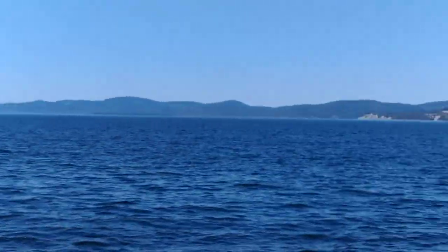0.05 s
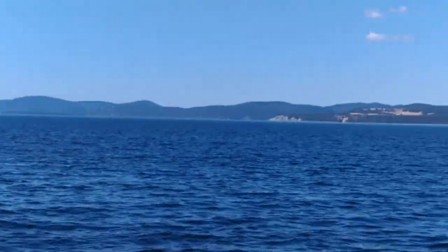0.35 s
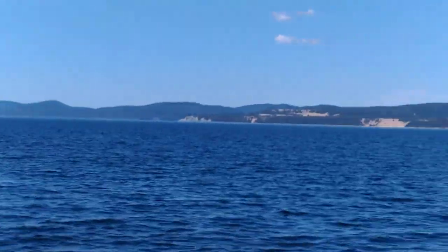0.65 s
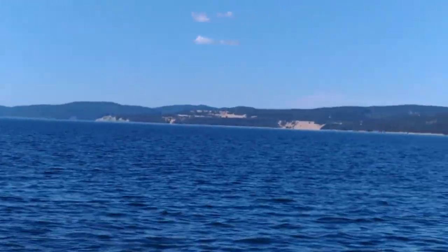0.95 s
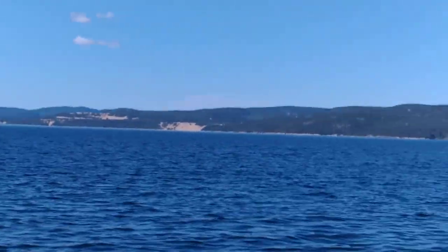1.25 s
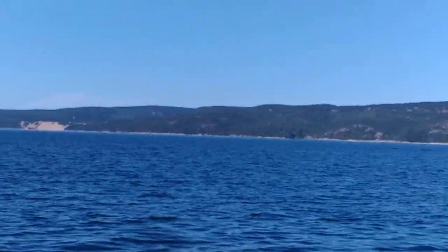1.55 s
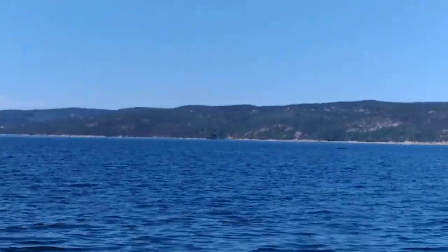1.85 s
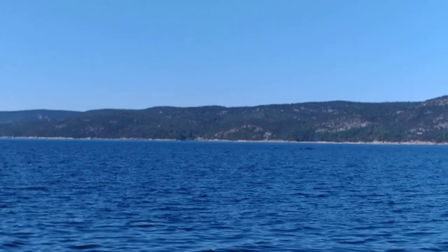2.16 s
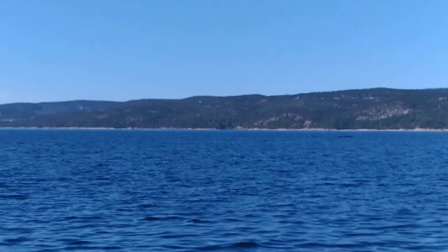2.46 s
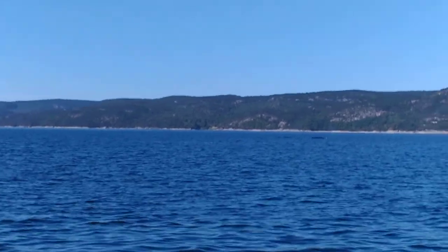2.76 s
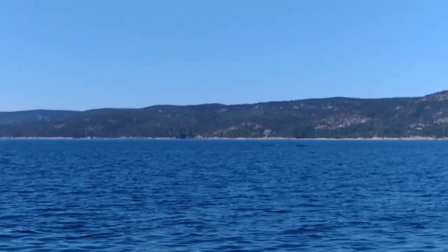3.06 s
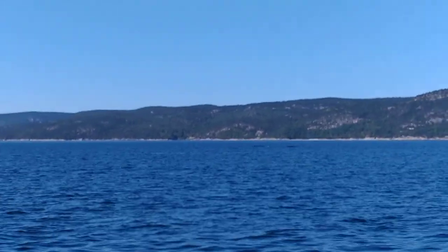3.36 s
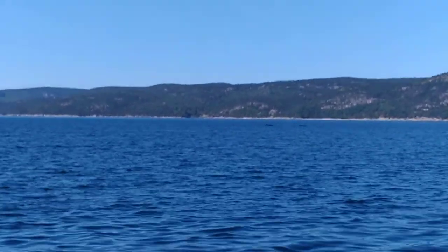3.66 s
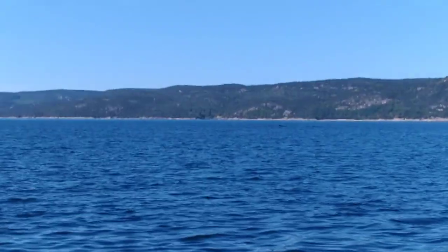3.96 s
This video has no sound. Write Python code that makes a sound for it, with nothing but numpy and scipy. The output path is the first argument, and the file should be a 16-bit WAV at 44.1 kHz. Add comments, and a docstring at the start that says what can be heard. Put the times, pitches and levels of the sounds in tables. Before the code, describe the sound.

Gusts of wind rumble and knock against the microphone out on open water, easing briefly early on, then blowing more steadily from the right. Small waves wash and trickle behind it, along with a faint low engine hum.

```python
"""Wind gusts thump two microphone ports, mostly the right, on open water, probably from a boat.
Eddies buffet the ports; air hisses across their openings and rustles at the right rim.
Wavelets gurgle and trickle as bubbles ring; short grainy bursts are wind rustle or a little spray.
Underneath lie the wash of the water and a faint drone, likely an engine."""
import sys
import numpy as np
from scipy import signal
from scipy.fft import rfft, irfft
from scipy.io import wavfile
from scipy.ndimage import uniform_filter1d, minimum_filter1d

SR = 44100
rng = np.random.default_rng(int(sys.argv[2]) if len(sys.argv) > 2 else 0)


def to_wav(s):
    """Save 16-bit WAV."""
    ch = np.atleast_2d(s).T  # columns
    pcm = np.round(np.clip(ch, -1, 1) * 32767)  # PCM
    wavfile.write(sys.argv[1], SR, pcm.astype(np.int16))


N = 176400
TIME = np.arange(N) / SR
HZ = np.fft.rfftfreq(N, 1 / SR)

# wind pressure per port (time [s], level [dB])
GUST_LEFT = [(0.0, -9), (0.13, -22), (0.24, -16), (0.31, -26), (0.35, -20.5), (0.48, -52), (0.85, -25.5),
             (0.99, -19), (1.11, -37), (1.18, -22), (1.27, -45), (1.51, -39), (1.56, -21), (1.61, -21.5),
             (1.65, -58), (2.13, -54), (2.18, -11.5), (2.24, -54), (3.41, -54), (3.46, -15), (3.52, -50),
             (3.84, -27), (3.86, -43), (4.0, -30)]
GUST_RIGHT = [(0, -13.5), (.13, -24.5), (.255, -27), (.28, -15), (.32, -21), (.36, -18.5), (.44, -15.5),
              (.47, -28.5), (0.494, -18.5), (.53, -28), (.67, -53), (.78, -31.5), (1.04, -32.5),
              (1.088, -17.5), (1.13, -31.5), (1.16, -17.5), (1.21, -24), (1.245, -16), (1.275, -24),
              (1.3, -16), (1.35, -22), (1.44, -27.5), (1.47, -16), (1.62, -14), (1.8, -26), (1.82, -36),
              (1.84, -28.5), (1.89, -15.5), (1.97, -23), (2, -16.5), (2.45, -15), (2.49, -12.5),
              (2.54, -12.5), (2.575, -22), (2.601, -13.5), (2.88, -16), (2.97, -13.5), (3.06, -18),
              (3.09, -15), (3.27, -13), (3.48, -14.5), (3.55, -28.5), (3.61, -27.5), (3.64, -25.5),
              (3.669, -15), (3.75, -12), (3.81, -21.5), (3.91, -17), (3.96, -23), (4, -17.5)]
# buffeting in a full gust (frequency [Hz], relative density [dB])
BUFFET_COLOUR = [(20, -52), (48, -42), (62, -18), (76, -8.5), (88, -11.5), (125, 2.5), (145, -2),
                 (200, 0.5), (300, -3), (450, -8.5), (700, -18.5), (1100, -37.5), (1800, -42), (2600, -60),
                 (3600, -59), (7000, -85)]
# right-port buffeting felt on the left (frequency [Hz], gain [dB])
SPILL_GAIN = [(40, -24), (75, -8), (125, -18), (250, -33), (600, -23), (2000, -36)]
# hard eddies (time [s], relative peak [dB], pitch [Hz], rise [s], port [0 left, 1 right])
THUMP_EVENTS = [(0.005, 8, 243, 0.0034, 0), (0.03, -7, 275, 0.0051, 0), (0.058, -5, 332, 0.0015, 0),
                (.274, -9, 133, .005, 1), (0.286, -12, 335, 0.0018, 1), (.39, -11.5, 108, .02, 1),
                (0.658, -24.5, 596, 0.0033, 1), (0.994, -11.5, 169, 0.0057, 0), (1.081, -12, 140, .008, 1),
                (1.159, -17.5, 260, 0.0052, 1), (1.241, -17, 385, .003, 1), (1.301, -12.5, 194, 0.0042, 1),
                (1.47, -5, 210, 0.0023, 1), (1.569, -8, 220, 0.0034, 1), (1.894, -13, 356, 0.0018, 1),
                (2.008, -8.5, 447, 0.0048, 1), (2.053, -5, 223, 0.0032, 1), (2.14, -6, 243, 0.0049, 1),
                (2.181, -9, 178, 0.0077, 1), (2.257, -6, 199, 0.0027, 1), (2.28, -3.5, 310, 0.0046, 1),
                (2.505, -20, 228, 0.0037, 1), (2.616, -5, 230, 0.0049, 1), (2.758, -4, 239, 0.0029, 1),
                (2.984, -2.5, 243, 0.0025, 1), (3.209, 1, 270, 0.0026, 1), (3.232, -1.5, 268, 0.0027, 1),
                (3.255, -9, 222, 0.0026, 1), (3.279, -3.5, 268, 0.0059, 1), (3.314, -9.5, 268, 0.0034, 1),
                (3.709, 0, 209, 0.0019, 1), (3.734, -2.5, 227, 0.0056, 1), (3.748, -13, 317, 0.0065, 1),
                (3.911, -7, 172, 0.0043, 1)]
# eddy roughness (frequency [Hz], relative density [dB])
THUMP_COLOUR = [(30, -47), (120, 0), (280, 6), (550, -2.5), (1000, -15), (2000, -37.5), (6000, -70)]
# hiss per port (time [s], relative level [dB])
HISS_LEFT = [(0.0, -38.5), (0.32, -40.5), (0.41, -39), (0.47, -40.5), (1.41, -41), (1.53, -27), (1.61, -33),
             (1.74, -42.5), (2.09, -42.5), (2.14, -32), (2.28, -41.5), (2.55, -36.5), (2.64, -44),
             (2.72, -38), (3.03, -43), (3.16, -43), (3.38, -45), (3.47, -38.5), (3.65, -41), (4.0, -41.5)]
HISS_RIGHT = [(0.0, -34), (0.27, -39.5), (0.3, -32.5), (0.44, -32), (0.47, -38), (0.71, -43), (0.81, -39),
              (0.96, -42.5), (1.11, -41.5), (1.26, -43), (1.32, -34.5), (1.42, -39.5), (1.53, -30.5),
              (1.61, -36.5), (1.73, -44), (2.0, -47), (2.02, -34), (2.21, -36.5), (2.39, -32.5), (2.6, -36),
              (2.97, -35), (3.06, -43), (3.09, -35), (3.32, -36.5), (3.4, -34), (3.49, -36), (3.65, -47.5),
              (3.68, -33), (3.86, -44), (3.88, -34.5), (4.0, -44)]
# hiss with port resonances and notches (frequency [Hz], relative density [dB])
HISS_COLOUR = [(600, 4.5), (2200, -13), (3000, -18), (3800, -18.5), (4100, 1), (4450, 0), (5300, -2.5),
               (6000, -2.5), (6500, -3), (7200, -2), (7700, -12), (7950, -35), (8400, -9.5), (9300, -4),
               (10500, -1), (11400, -3.5), (11950, -14), (12300, -47), (12750, -32), (13200, -15),
               (14300, -14.5), (15700, -18)]
# extra shaping of the left hiss (frequency [Hz], gain [dB])
LEFT_SHADE = [(3000, 7), (5300, 9.5), (7200, -0.5), (9300, 3), (11400, -4.5), (14000, 3), (15500, -4)]
# fast air at the right rim (frequency [Hz], relative density [dB])
RUSTLE_COLOUR = [(400, -34), (900, 11), (1080, -6.5), (1300, 3), (1700, -3.5), (2050, -7), (2400, -6.5),
                 (2900, -3), (3500, -20), (4500, -21), (7000, -44)]
# right-port resonances (centre [Hz], width [Hz], level [dB])
RESONANCES = [(4480, 300, -48), (5890, 140, -53.5)]
# short grainy bursts: wind rustling at the right port (0.288 s, 0.347 s), and water splashes
# (start [s], length [s], left [dB], right [dB], centre [Hz], half-width [octaves])
NOISE_BURSTS = [(.005, 0.12, -42, -37.5, 850, .55), (0.288, 0.05, -49, -34.5, 940, 0.67),
                (0.347, 0.092, -47, -36, 1380, 1.12), (1.453, 0.15, -39.5, -37.5, 5000, 0.52),
                (1.514, 0.063, -33.5, -37, 3770, 0.77), (1.642, 0.016, -47, -40, 1500, 0.92),
                (2.127, .025, -39, -32, 5330, 0.22), (2.72, 0.032, -57, -46, 3500, 0.087),
                (3.114, 0.21, -56, -43, 1570, 0.37), (3.44, 0.05, -44, -42, 3000, 0.67)]
# bubbles (low [Hz], high [Hz], rate [1/s], decay [cycles], size spread [dB], base level [dB])
GURGLE_BUBBLES = (848.5, 2152, 227, 16.5, 2.3, -38.5)
TRICKLE_BUBBLES = (4247, 6103, 202, 19, 9, -54)
# water wash (frequency [Hz], relative density [dB])
WASH_COLOUR = [(20, -32), (48, -30), (75, -18), (95, -4), (125, 5), (210, -7.5), (290, -6.5), (450, -10.5),
               (700, -11), (850, -19), (1000, -17), (1200, -22.5), (2000, -29), (3000, -32), (3800, -37),
               (8000, -67)]
# left-right likeness of the wash (frequency [Hz], correlation [0..1])
WASH_CORRELATION = [(60, 0.24), (130, 0.17), (290, 1), (640, 0.93), (1400, 0.56), (3000, 0.0046)]
# drone lines (frequency [Hz], level [dB])
ENGINE_LINES = [(41, -68), (76, -45), (120.5, -42.5), (301, -40.5)]

FULL_GUST_DB = -13


def buffet(gust, gain_db):
    """Eddies buffet one port; stronger gusts are brighter, and the upper octaves flutter more."""
    eddy_db, eddy_hz, flutter_db, flutter_hz = 1.14, 24.7, 2.5, 64
    tilt_per_octave, tilt_above_hz = 0.58, 211
    force_db, eddies, shared_flutter = curve(gust), wobble(eddy_hz), wobble(flutter_hz)
    air = flecked(BUFFET_COLOUR, depth_db=2.5)
    steady_air = rfft(air / np.sqrt(uniform_filter1d(air ** 2, size=2600)))
    centres_hz, out = np.geomspace(60, 3840, 7), np.zeros(N)
    for hz, share in zip(centres_hz, np.eye(len(centres_hz))):
        band = irfft(steady_air * spectrum(np.c_[centres_hz, share], HZ), N)
        octaves = max(np.log2(hz / tilt_above_hz), 0)
        flutter = (shared_flutter + wobble(flutter_hz)) / np.sqrt(2)
        churn = unit(amp(eddy_db * eddies + flutter_db * min(octaves, 1) * flutter))
        tilt_db = tilt_per_octave * octaves * (force_db - FULL_GUST_DB)
        out += band * churn * amp(force_db + tilt_db)
    return amp(gain_db) * out


def thumps(gain_db=-3.5, rough_db=-9, fall_per_rise=1.12):
    """Hard eddies rock one port for a few rough swings and die quickly."""
    out = np.zeros((2, N))
    rough = amp(rough_db) * noise(spectrum(THUMP_COLOUR, HZ))
    for time_s, peak_db, hz, rise_s, port in THUMP_EVENTS:
        age_s = TIME - time_s
        width_s = np.where(age_s < 0, rise_s, rise_s * fall_per_rise)
        push = np.exp(-.5 * (age_s / width_s) ** 2)
        swing = np.sin(2 * np.pi * (hz * age_s + rng.random()))
        out[port] += amp(peak_db + gain_db) * push * (swing + rough)
    return out


def hiss(levels, gain_db, shade_db=0, flicker_db=0.98, flicker_hz=44.4):
    """Air streams across one port's opening."""
    air = rfft(flecked(HISS_COLOUR, depth_db=3))
    shaded = unit(irfft(air * amp(shade_db), N))
    return shaded * amp(curve(levels) + gain_db + flicker_db * wobble(flicker_hz))


def rush_db(hiss_cap_db=-34.5):
    """Strength of the rushing air: follows the right port's gusts and, up to a cap, its hiss."""
    from_hiss_db = 1.42 * np.minimum(curve(HISS_RIGHT) - hiss_cap_db, 0)
    from_gust_db = 0.65 * (curve(GUST_RIGHT) - FULL_GUST_DB)
    return from_hiss_db + from_gust_db


def rustle(base_db=-40.5, surge_db=3.5, surge_hz=20):
    """Fast air rustles in surges at the rim of the windward port."""
    air = flecked(RUSTLE_COLOUR, depth_db=6)
    return air * amp(base_db + rush_db() + surge_db * wobble(surge_hz))


def ringing(waver_db=3.5, waver_hz=16):
    """Narrow resonances sing faintly in the hiss, wavering in strength."""
    out = np.zeros(N)
    for hz, width_hz, level_db in RESONANCES:
        band = noise(-10 * np.log10(1 + (2 * (HZ - hz) / width_hz) ** 4))
        out += band * amp(level_db + waver_db * np.tanh(wobble(waver_hz)))
    return out


def noise_bursts(rise_s=0.0022, grain_db=2.5, grain_hz=300):
    """Grainy bursts of wind rustle or spray start quickly, hold and fall, different at each port."""
    out = np.zeros((2, N))
    grain = np.array([unit(amp(grain_db * wobble(grain_hz))) for side in range(2)])
    for start_s, length_s, left_db, right_db, hz, half_octaves in NOISE_BURSTS:
        colour_db = -10 * np.log10(1 + (np.log2((HZ + 1) / hz) / half_octaves) ** 12)
        age_s = np.maximum(TIME - start_s, 0)
        swell = (1 - np.exp(-age_s / rise_s)) * np.exp(-(age_s / length_s) ** 4)
        out += np.array([noise(colour_db), noise(colour_db)]) * amp([[left_db], [right_db]]) * swell
    return out * grain


def bubbles(low_hz, high_hz, per_s, decay_cycles, spread_db, level_db, glide_per_decay=.008):
    """Bubbles of many sizes ring briefly at random moments, each rising a little in pitch."""
    out, age_s = np.zeros(N), TIME[:SR // 12]
    pitches_hz = np.geomspace(low_hz, high_hz, 24)
    for hz in pitches_hz:
        decays = age_s * hz / decay_cycles
        envelope = (1 - np.exp(-4 * decays)) * np.exp(-decays)
        ring = envelope * np.sin(2 * np.pi * hz * age_s * (1 + glide_per_decay * decays / 2))
        births = rng.random(N) < per_s / len(pitches_hz) / SR
        sizes = amp(spread_db * np.minimum(rng.exponential(1, N), 3))
        out += signal.oaconvolve(births * sizes, ring)[:N]
    return amp(level_db) * unit(out)


def wavelets(gurgle_left_db=-16.5, trickle_left_db=-7.5):
    """Wavelets gurgle more as the wind rises; a fine trickle goes on throughout."""
    gurgle = bubbles(*GURGLE_BUBBLES) * amp(rush_db()) * amp([[gurgle_left_db], [0]])
    trickle = np.array([bubbles(*TRICKLE_BUBBLES) for side in range(2)])
    return from_the_right(gurgle) + trickle * amp([[trickle_left_db], [0]])


def wash(left_db=-33, right_db=-32):
    """A wide wash, flecked where wavelets break, partly alike at both ports."""
    left, independent = (rfft(flecked(WASH_COLOUR, depth_db=7.5)) for side in range(2))
    correlation = spectrum(WASH_CORRELATION, HZ)
    right = correlation * left + np.sqrt(1 - correlation ** 2) * independent
    return irfft(np.array([left, right]), N) * amp([[left_db], [right_db]])


def engine(pitch_wander=0.016, wander_hz=5.7, swell_db=13.5):
    """An engine drones in a few low lines that waver in pitch and strength."""
    out = np.zeros(N)
    for hz, level_db in ENGINE_LINES:
        turns = np.cumsum(hz * (1 + pitch_wander * wobble(wander_hz))) / SR
        swell = amp(swell_db * np.tanh(wobble(wander_hz)))
        out += amp(level_db) * unit(np.sin(2 * np.pi * turns) * swell)
    return out


def from_the_right(pair, lag_s=0.00051):
    """Sound from the right reaches the left port later."""
    late_left = irfft(rfft(pair[0]) * np.exp(-2j * np.pi * HZ * lag_s), N)
    return np.array([late_left, pair[1]])


def amp(db):
    """Decibels to gain."""
    return 10 ** (np.asarray(db) / 20)


def unit(x):
    """Scales to rms 1."""
    return x / np.sqrt(np.mean(x ** 2) + 1e-20)


def spectrum(points, hz):
    """Reads a table on a log-frequency axis."""
    points_hz, values = np.transpose(points)
    return np.interp(np.log(hz + 1), np.log(points_hz + 1), values)


def curve(points):
    """Reads a table over time."""
    return np.interp(TIME, *np.transpose(points))


def noise(colour_db):
    """Coloured noise, rms 1."""
    return unit(irfft(rfft(rng.standard_normal(N)) * amp(colour_db), N))


def wobble(rate_hz):
    """Random motion, rms 1, mostly in the two octaves below the rate."""
    lowpass_db = -10 * np.log10(1 + (HZ / rate_hz) ** 4)
    highpass_db = -10 * np.log10(1 + (rate_hz / 4 / (HZ + 1e-3)) ** 4)
    return noise(lowpass_db + highpass_db)


def flecked(colour, depth_db):
    """Coloured noise, rms 1, with dense louder and softer flecks a few hundredths of a second long."""
    real, imag, field = rng.standard_normal((3, 513, N // 256 + 5))
    patches = uniform_filter1d(uniform_filter1d(field, size=3, axis=0), size=6, axis=1)
    flecks = amp(depth_db * np.tanh(2 * unit(patches)))
    white = signal.istft((real + 1j * imag) * flecks, nperseg=1024, noverlap=768)[1][:N]
    return unit(irfft(rfft(white) * amp(spectrum(colour, HZ)), N))


def scene():
    """Wind at each port over water and engine."""
    right_gusts = buffet(GUST_RIGHT, gain_db=0.72)
    spill = irfft(rfft(right_gusts) * amp(spectrum(SPILL_GAIN, HZ)), N)
    gusts = np.array([spill, right_gusts])
    left = buffet(GUST_LEFT, gain_db=-1)
    left += hiss(HISS_LEFT, gain_db=-4, shade_db=spectrum(LEFT_SHADE, HZ))
    right = hiss(HISS_RIGHT, gain_db=0.55) + rustle() + ringing()
    at_ports = np.array([left, right]) + thumps()
    return at_ports + from_the_right(gusts + wash() + engine()) + noise_bursts() + wavelets()


def record(dry, fade_in_s=.004, low_cut_hz=38, ceiling=.93, high_cut_hz=15850):
    """Soft start, low cut, quick limiter on the strongest thumps, band limit."""
    highpass = signal.butter(3, low_cut_hz, "high", fs=SR, output="sos")
    cut = signal.sosfilt(highpass, dry * np.minimum(TIME / fade_in_s, 1))
    gain = minimum_filter1d(ceiling / np.maximum(abs(cut), ceiling), size=301)
    limited = cut * uniform_filter1d(uniform_filter1d(gain, size=151), size=151)
    lowpass = signal.firwin(511, high_cut_hz, window=("kaiser", 9), fs=SR)
    return signal.oaconvolve(limited, lowpass[None], "same")


dry = scene()
out = record(dry)
to_wav(out)
```